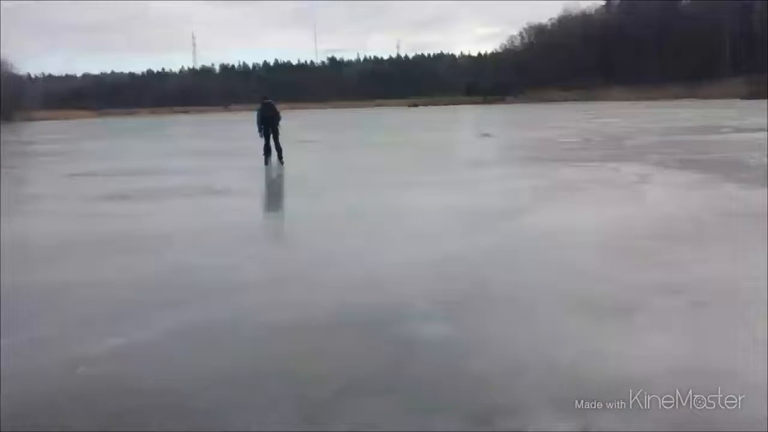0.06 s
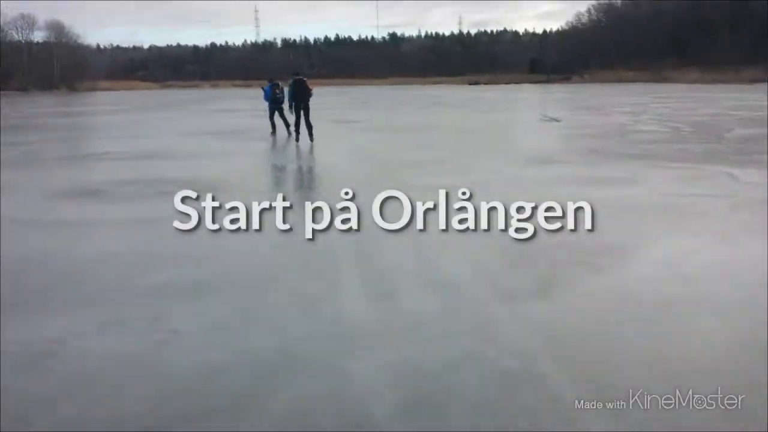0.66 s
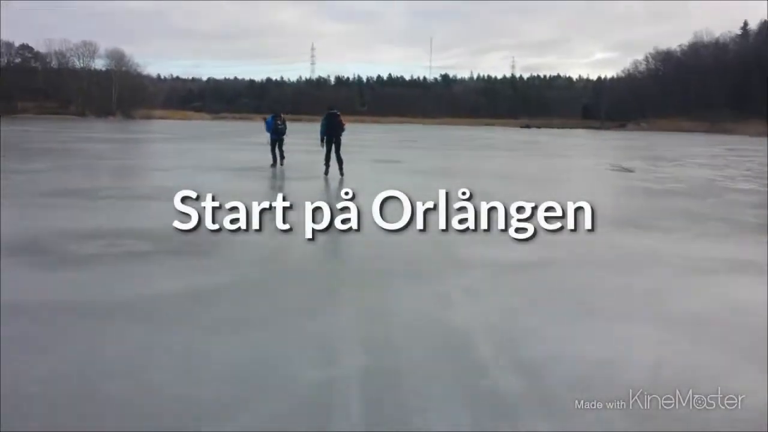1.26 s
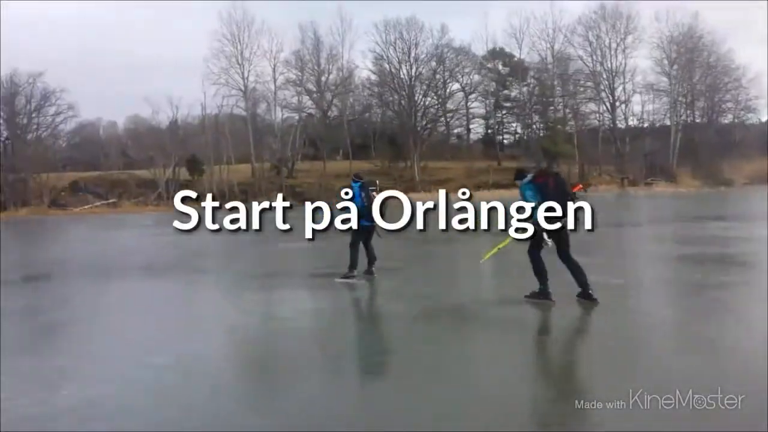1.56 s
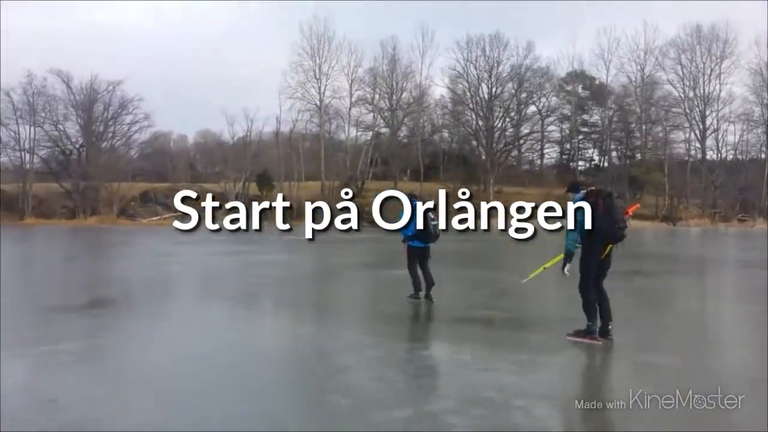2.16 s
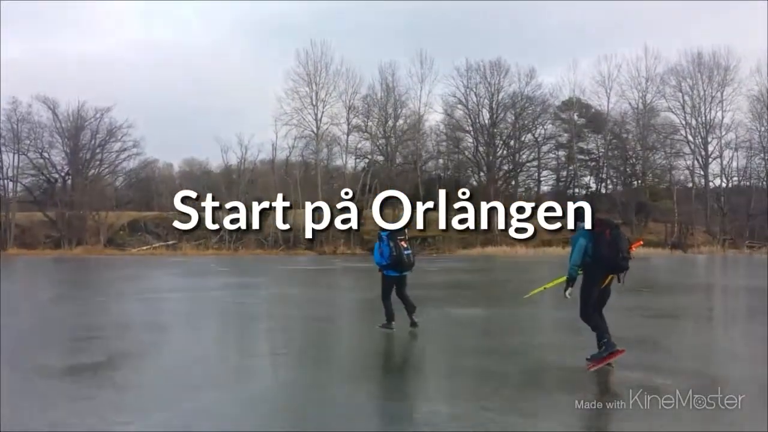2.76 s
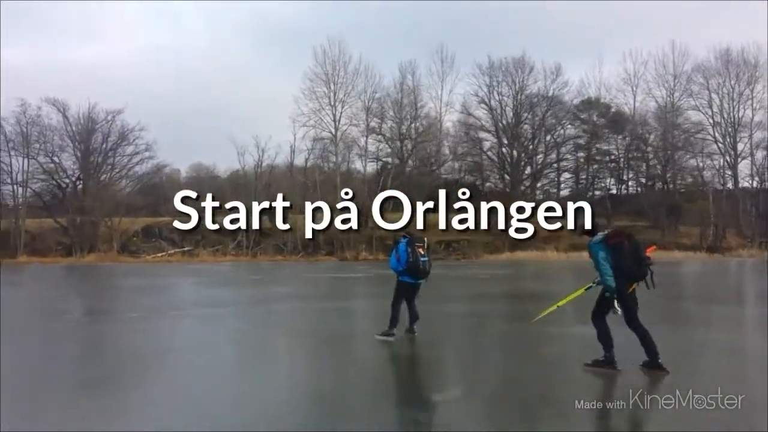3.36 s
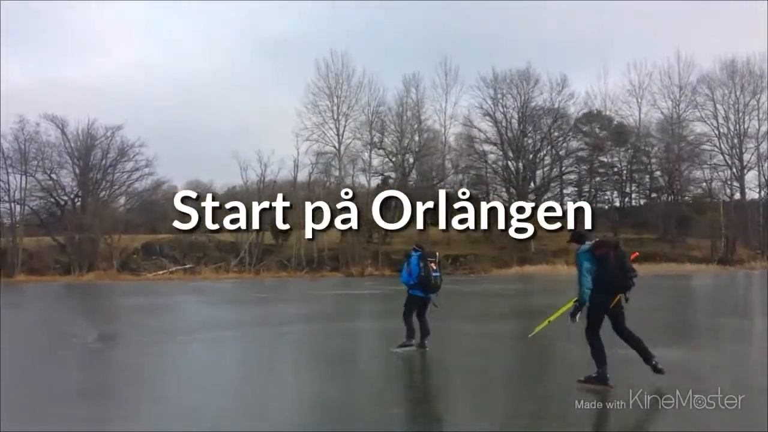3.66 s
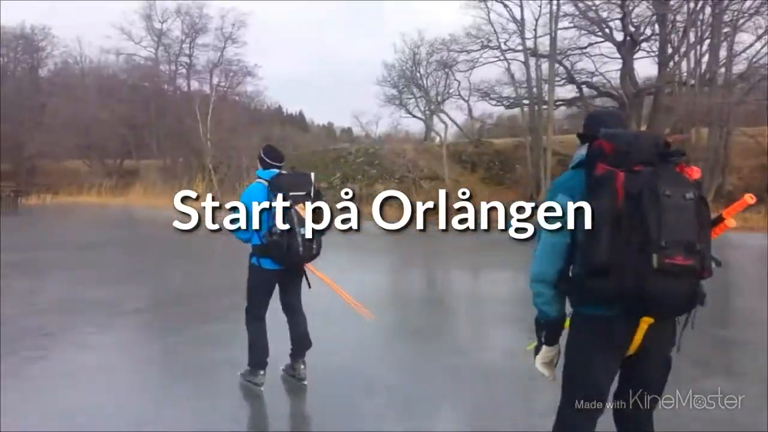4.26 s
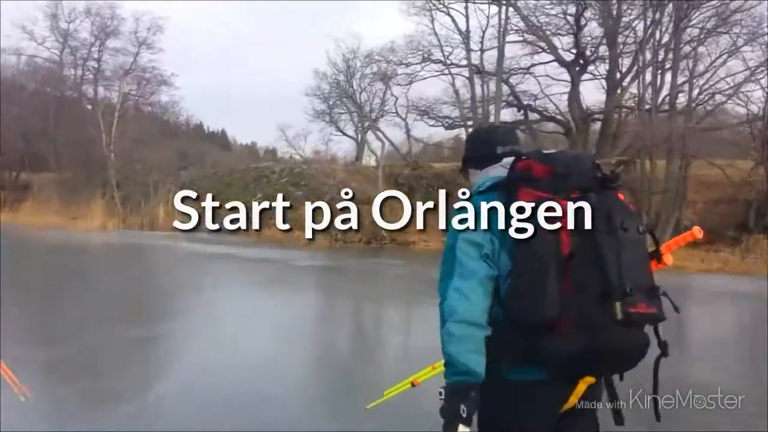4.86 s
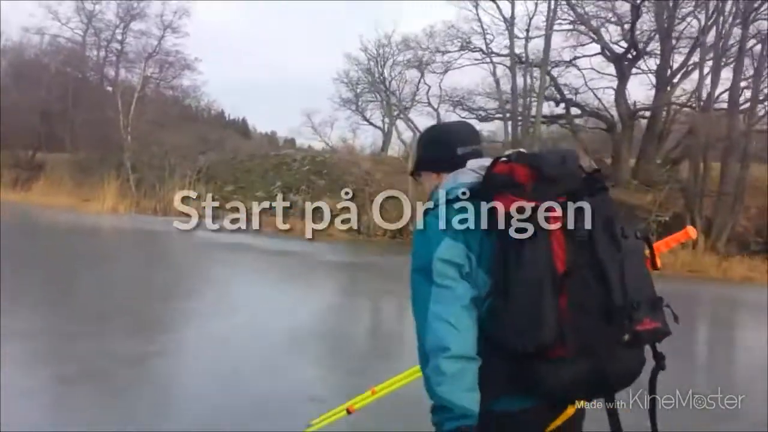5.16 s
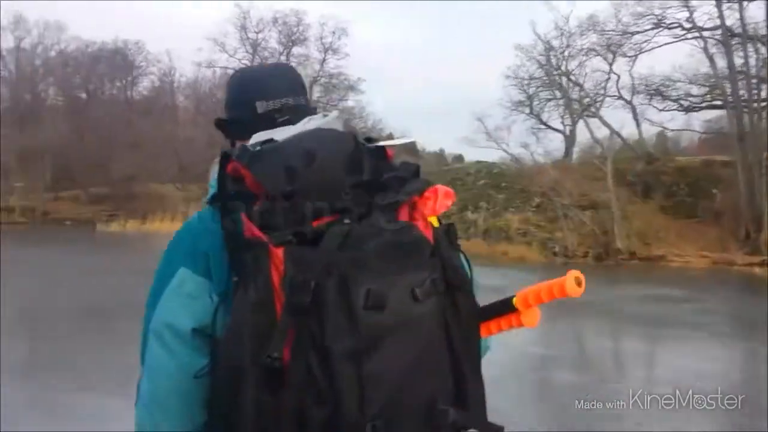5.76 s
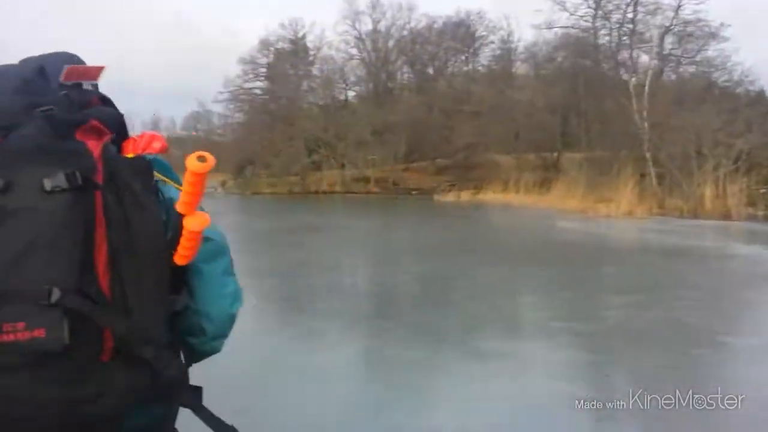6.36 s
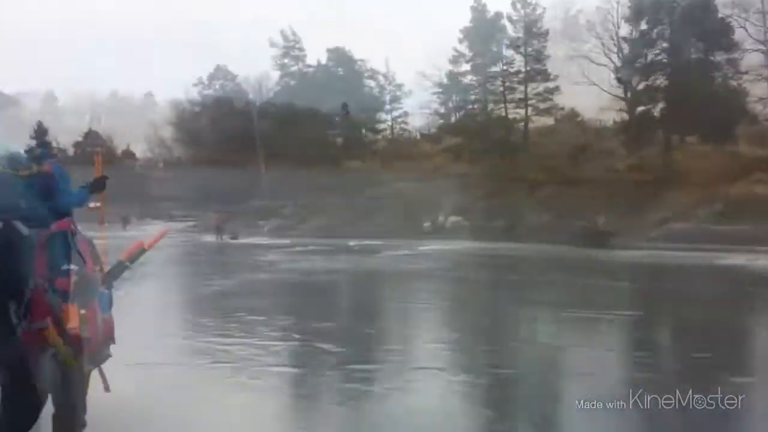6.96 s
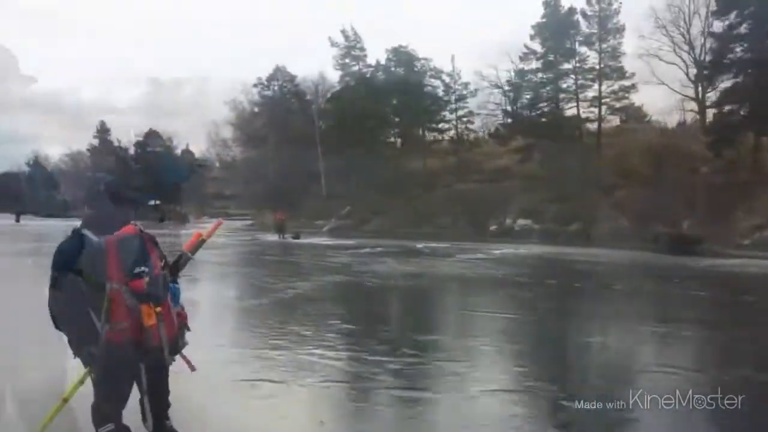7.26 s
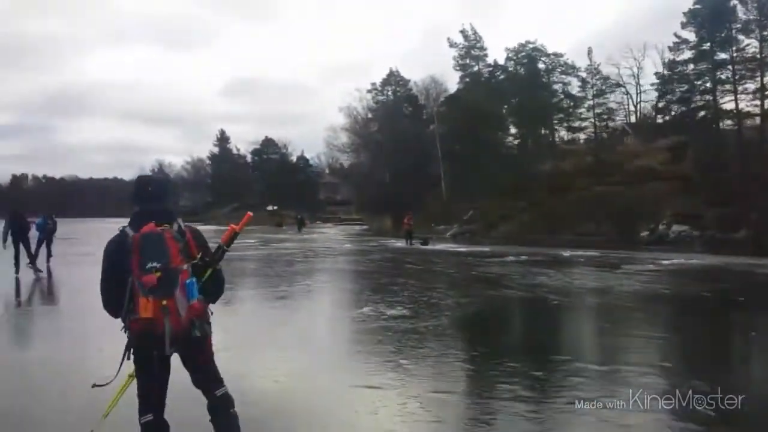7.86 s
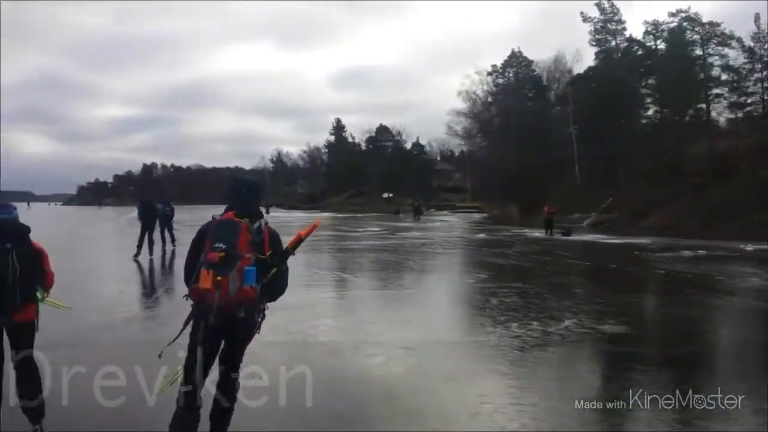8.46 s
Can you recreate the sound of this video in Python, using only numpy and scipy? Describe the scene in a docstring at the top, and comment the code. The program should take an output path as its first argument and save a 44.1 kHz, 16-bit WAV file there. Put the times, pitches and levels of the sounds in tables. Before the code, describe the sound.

Steel skate blades glide across a frozen lake with a coarse scrape, irregular clacks and rasping, sometimes squealing pushes, heard outdoors from a moving skater's microphone. Low wind rumble and small taps of gear run alongside. Two loud, crunching thumps hit the microphone, one early and one midway, each followed by a quieter stretch. The skating then builds again, with a short brush of fabric, and ends rattling over bumps.

```python
"""Long skates on lake ice, heard from a camera that one of the skaters carries.
After a short silence the blades grind, hiss and clack over bumps, air rumbles on the microphone and gear
ticks. From 1 s on, pushes make the steel edge bite, growl and squeal. At 1.6 s and 4.2 s a hard knock
sets the camera mount booming and overloads the input; after each knock the whole sound ducks, then
recovers over about a second. More pushes, two brushes of fabric and a clatter over rough ice follow."""
import sys
import numpy as np
from scipy import signal
from scipy.fft import rfft, irfft, next_fast_len
from scipy.io import wavfile
from scipy.ndimage import map_coordinates

SR = 44100
rng = np.random.default_rng(int(sys.argv[2]) if len(sys.argv) > 2 else 0)


def transcribe(signal):
    """Save signal, clipped to [-1, 1], as a 16-bit WAV file at the path in sys.argv[1]."""
    frames = np.atleast_2d(signal).T
    limited = np.clip(frames, -1, 1)
    pcm = np.round(limited * 32767).astype(np.int16)
    wavfile.write(sys.argv[1], SR, pcm)


N = 374850
TIME = np.arange(N) / SR

# hard knocks on the camera mount: t/s, boom/dB, crunch/dB
KNOCKS = [(1.5815, -4.5, 7), (4.2007, -5, 8.5)]
# tone colour of fine ice spraying off the blade: f/Hz, level/dB
HISS_COLOUR = [(1500, -35), (2300, 5.5), (3000, 4.5), (3700, -1.5), (4600, 2), (5200, 0.5), (5750, 2),
               (6600, -3), (8000, -6.5), (10000, -10), (12000, -22), (15000, -28)]
# tone colour of the ringing skate: f/Hz, level/dB
RING_COLOUR = [(900, -37.5), (1350, -10.5), (1650, 4.5), (1880, 6), (2020, -2), (2200, -16), (3000, -76.5)]


def amp(db):
    """Turn decibels into a gain."""
    return 10 ** (np.asarray(db) / 20)


def unit(x):
    """Scale a signal to an average power of 1."""
    return x / np.sqrt(np.mean(x ** 2) + 1e-20)


def along(points, hz):
    """Read a table of (frequency, value) points on a log frequency axis."""
    freqs, values = np.transpose(points)
    return np.interp(np.log(hz + 1), np.log(freqs + 1), values)


def wobble(rate):
    """A smooth random curve through `rate` points a second."""
    return map_coordinates(rng.standard_normal(int(N * rate / SR) + 4), [TIME * rate])


def add(track, start, sound):
    """Mix a sound into a track, `start` seconds in."""
    i = round(start * SR)
    track[..., i:i + sound.shape[-1]] += sound[..., :N - i]


def panned(pair, pan_db):
    """Make the left channel pan_db louder than the right."""
    return pair * np.array([amp(pan_db / 2), amp(-pan_db / 2)]).reshape(2, -1)


def filtered(x, response):
    """Give each frequency the gain response(hz)."""
    size = next_fast_len(N + SR // 4)
    return irfft(rfft(x, size) * response(np.fft.rfftfreq(size, 1 / SR)), size)[..., :N]


def band(x, hz, width_hz):
    """Keep the sound near one pitch: a resonance, applied twice for steep sides."""
    b, a = signal.iirpeak(hz, hz / width_hz, fs=SR)
    return signal.lfilter(b, a, signal.lfilter(b, a, x))


def coloured(x, colour, size=4096):
    """Give a sound a tone colour, with a filter that rings only after each hit (minimum phase)."""
    cepstrum = irfft(np.log(amp(along(colour, np.fft.rfftfreq(size, 1 / SR)))))
    cepstrum[1:size // 2] *= 2
    cepstrum[size // 2 + 1:] = 0
    kernel = irfft(np.exp(rfft(cepstrum)))
    return signal.oaconvolve(x, kernel[None] / np.linalg.norm(kernel), axes=1)[:, :N]


def grit(rate, spread_db, smooth):
    """Two streams of tiny ice fractures, about `rate` a second, over smooth rubbing noise."""
    hits = rng.random((2, N)) < rate / SR
    sizes = amp(spread_db * np.minimum(rng.exponential(size=(2, N)), 3))
    signs = rng.choice([-1, 1], (2, N))
    return unit(unit(hits * sizes * signs) + smooth * rng.standard_normal((2, N)))


def struck(t, t60, rise):
    """The loudness of a hit: it builds in about `rise` seconds and fades 60 dB in `t60` seconds."""
    return amp(-60 * t / t60) * (1 - np.exp(-t / rise))


def burst(t, t60, rise):
    """Two streams of fading contact noise, each of energy 1."""
    noise = rng.standard_normal((2, len(t))) * struck(t, t60, rise)
    return noise / np.linalg.norm(noise, axis=1, keepdims=True)


def blow(t, t60, scatter):
    """A sharp contact followed by a scatter of crumbling ice."""
    force = scatter * burst(t, t60, rise=0.00013)
    force[0, 0] += 1
    return force


def ports(pair):
    """Two microphone openings hear the first stream together and the second with opposite signs."""
    # how much louder the left opening is: f/Hz, left minus right/dB
    balance = [(100, 8), (230, 1.5), (400, 1), (900, -0.5), (1400, 6.5), (1850, 7.5), (2350, 0), (3200, 8),
               (4500, 3.5), (5750, 11.5), (7500, 2), (9000, -1), (11000, -20), (15000, -5)]
    # how alike the two sides sound: f/Hz, likeness (0 to 1)
    likeness = [(50, 0.084), (120, 0.26), (230, 0.46), (420, 0.83), (950, 0.8), (1350, 0.7), (1750, 0.5),
                (3000, 0.2), (6000, 0.15), (14000, 0.1)]
    # how far the left side is ahead: f/Hz, phase/rad
    lead = [(100, 1.07), (400, 0.082), (900, 0.11), (1350, 1.42), (1750, 0.76), (2250, 3.08), (3200, 1.15)]
    size = next_fast_len(N + SR // 4)
    hz = np.fft.rfftfreq(size, 1 / SR)
    angle = np.arccos(np.clip(along(likeness, hz), 0, 1)) / 2
    left = amp(along(balance, hz) / 2) * np.exp(.5j * along(lead, hz))
    right = 1 / left
    centre_gain = np.hypot(np.cos(angle) * abs(left + right), np.sin(angle) * abs(left - right)) / 2
    shared, apart = rfft(pair, size) * [np.cos(angle), np.sin(angle)] / centre_gain
    return irfft(np.array([left * (shared + apart), right * (shared - apart)]), size)[:, :N]


def air():
    """Passing air rumbles in uneven swells; after a knock the shaking camera briefly rumbles louder."""
    # air streaming past the camera: t/s, level/dB
    airflow = [(0.7, -34.5), (1.0, -27), (1.58, -32.5), (1.85, -56), (2.5, -47.5), (2.7, -42), (2.9, -35.5),
               (3.35, -32), (4.1, -30.5), (4.48, -54), (5.12, -57.5), (5.36, -45.5), (5.95, -41.5),
               (6.7, -45), (8.2, -44.5), (8.5, -38)]
    # tone colour of the rumble: f/Hz, level/dB
    rumble_colour = [(12, -53), (20, -17), (134, 4), (253, -6.5), (350, -13), (460, -17), (770, -120)]
    level_db = np.interp(TIME, *np.transpose(airflow))
    for start, _, _ in KNOCKS:
        shudder_db = -17.5 - 155 * (TIME - start)
        level_db = np.where(TIME > start, np.maximum(level_db, shudder_db), level_db)
    rumble = filtered(rng.standard_normal((2, N)), lambda hz: amp(along(rumble_colour, hz)))
    swells_db = 2.24 * wobble(14) + 1.46 * wobble(7)
    return amp(level_db + 4 + swells_db) * unit(rumble)


def gear():
    """Buckles tick and stiff fabric brushes past the camera, both bright and close."""
    # ticks of small hard parts: t/s, level/dB
    tick_events = [(0.656, -25.5), (0.93, -43), (1.504, -29.5), (1.583, -35.5), (2.3095, -53.5),
                   (2.476, -54), (2.784, -44.5), (3.362, -35), (3.809, -37), (4.0792, -35.5),
                   (4.1247, -37.5), (4.2023, -34), (4.6012, -44), (4.6587, -51), (8.2002, -28.5),
                   (8.2428, -31.5)]
    # tone colour of a tick: f/Hz, level/dB
    tick_colour = [(600, 2.5), (1800, 4), (4000, -1.5), (6000, 0), (9000, -3), (12500, -14), (15000, -19)]
    # brushes of fabric: start/s, loudest/s, end/s, level/dB
    brushes = [(6.26, 6.34, 6.375, -33.5), (8.271, 8.275, 8.35, -39.5)]
    # tone colour of the fabric: f/Hz, level/dB
    fabric_colour = [(600, 1), (1800, 5), (4000, 0.5), (6200, -1.5), (9000, -2), (12500, -6), (15000, -9.5)]
    ticks, cloth = np.zeros((2, 2, N))
    t = np.arange(SR // 16) / SR
    touch = np.exp(-.5 * ((t - .003) / 0.00098) ** 2)  # swells and fades within milliseconds
    for start, db in tick_events:
        add(ticks, start - .0005, amp(db + 3.5) * touch * rng.standard_normal((2, len(t))))
    fibres = unit(rng.standard_normal((2, N)) * amp(4 * wobble(220)))
    for start, loudest, end, db in brushes:
        swell_db = np.interp(TIME, [start, loudest, end], [-24, 0, -16])
        cloth += amp(db + swell_db) * fibres * ((TIME > start) & (TIME < end))
    return coloured(ticks, tick_colour) + coloured(cloth, fabric_colour)


def gear_taps():
    """Loose gear taps the camera's left side: a clack and a falling ring, smeared by rough contact."""
    # taps and rebounds: t/s, rattle f/Hz, thud/dB, ring/dB, crack/dB
    taps = [(0.656, 910, -18.5, -32.5, -29), (1.5067, 790, -15.5, -53, -33), (1.607, 810, -28.5, -48, -65),
            (4.0421, 900, -22.5, -48, -62), (4.0806, 980, -19.5, -41, -29), (4.1274, 1140, -21, -41, -34.5),
            (4.224, 922, -25.5, -52, -59)]
    hits = clacks(taps)
    chirps = np.zeros((2, N))
    t = np.arange(SR // 12) / SR
    halving_s = 0.0068  # the ring has dropped an octave by this time
    for start, hz, thud_db, _, _ in taps:
        cycles = 1.5 * hz * halving_s * np.log1p(t / halving_s)
        ring = np.sin(2 * np.pi * cycles) * amp(-60 * t / 0.13)
        contact = burst(t, t60=0.0083, rise=0.0001)
        add(chirps, start, amp(thud_db - 4) * signal.fftconvolve(contact, ring[None], axes=1))
    return panned(ports(hits + chirps), pan_db=9)


def mount_boom():
    """Knocks ring the camera mount, where two close low notes beat; the hand only bumps it dully."""
    # the mount's own notes: f/Hz, level/dB, time to fade 60 dB/s, left minus right/dB
    modes = [(129.1, 2, 0.38, 8.5), (146.7, -7, 0.42, 21), (215.4, -6.5, 0.27, -9), (256.8, -9, 0.22, 21),
             (318, 1, 0.089, 16), (106, -13, 0.038, 50), (538, -29, 0.26, 25)]
    # bumps of the hand on the camera: t/s, level/dB, f/Hz, time to fade 60 dB/s
    hand_bumps = [(0.894, -14.5, 128, 0.53), (1.355, 6.5, 75, 0.039), (3.943, 12, 85, 0.021),
                  (5.824, -23.5, 129, 0.2)]
    out = np.zeros((2, N))
    t = np.arange(SR // 2) / SR
    for start, db, _ in KNOCKS:
        for hz, mode_db, t60, pan_db in modes:
            ring = -np.sin(2 * np.pi * hz * t) * struck(t, t60, rise=0.0048)
            add(out, start, panned(amp(db + mode_db) * ring, pan_db))
    for start, db, hz, t60 in hand_bumps:
        thump = -np.sin(2 * np.pi * hz * t) * struck(t, t60, rise=0.0076)
        add(out, start, amp([[db + 4], [db - 5]]) * thump)
    return out


def mount_crunch():
    """The housing snaps on each hard knock, and the joints of the mount chatter for a moment."""
    # tone colour of the joints: f/Hz, level/dB
    joint_colour = [(200, -1), (450, 6), (1000, 9), (2000, -1), (4000, -31), (9000, -57)]
    joints, snaps = np.zeros((2, 2, N))
    t = np.arange(SR // 8) / SR
    for start, _, db in KNOCKS:
        chatter = burst(t, t60=0.087, rise=0.002) * amp(5 * wobble(270)[:len(t)])
        add(joints, start, amp(db - 4.5) * chatter / np.linalg.norm(chatter, axis=1, keepdims=True))
        add(snaps, start, amp(db - 1.5) * burst(t, t60=0.035, rise=0.00035))
    return coloured(joints, joint_colour) + band(snaps, hz=2430, width_hz=1960)


def clacks(hits):
    """Each hit gives a short thud, a little rattle, a ring at a pitch of its own and a crack."""
    # tone colour of the crack: f/Hz, level/dB
    crack_colour = [(1500, -39.5), (2250, 23), (3100, 19), (4000, 5.5), (5000, 14.5), (5900, 17),
                    (6700, 0.5), (10000, -8), (15000, -54)]
    out, cracks = np.zeros((2, 2, N))
    t = np.arange(SR // 16) / SR
    for start, rattle_hz, thud_db, ring_db, crack_db in hits:
        thud = np.sin(2 * np.pi * 0.82 * rattle_hz * t) * struck(t, t60=0.0068, rise=0.00062)
        rattle = band(burst(t, t60=0.016, rise=0.00086), rattle_hz, width_hz=550)
        ring = coloured(blow(t, t60=0.03, scatter=0.54), RING_COLOUR)
        pitch = 1 - 0.089 * rng.random() ** 2  # a little lower, depending on where the hit lands
        ring = np.array([map_coordinates(stream, [pitch * t * SR]) for stream in ring])
        add(out[0], start, amp(thud_db + 17.5) * thud)
        add(out, start, amp(thud_db + 38.5) * rattle)
        add(out, start, amp(ring_db + 23.5) * ring)
        add(cracks, start, amp(crack_db + 19) * blow(t, t60=0.023, scatter=0.59))
    return out + coloured(cracks, crack_colour)


def ice_bumps(grind_db):
    """The blades clack over big bumps and random small ones, which follow the grinding's loudness."""
    # big bumps in the ice: t/s, rattle f/Hz, thud/dB, ring/dB, crack/dB
    big_bumps = [(0.687, 650, -16, -30.5, -34), (0.859, 600, -35, -42, -47), (0.891, 824, -27, -34.5, -55),
                 (0.944, 900, -20, -32, -36.5), (0.967, 880, -25, -41, -49), (1, 990, -18.5, -26.5, -32),
                 (1.0149, 915, -23, -27.5, -38), (1.0491, 754, -36, -28, -31.5),
                 (1.1174, 570, -18, -28, -32), (1.1631, 625, -21.5, -50, -55),
                 (1.2488, 704, -18.5, -35, -30), (1.288, 492, -19, -36, -52),
                 (1.3165, 470, -16.5, -50, -30), (1.415, 556, -17.5, -55, -47),
                 (1.4435, 620, -13, -38, -28), (1.468, 590, -18, -44, -31), (1.474, 630, -20, -39, -29),
                 (1.488, 790, -41, -40, -37), (1.803, 740, -19, -30.5, -32.5), (1.8253, 830, -30, -31, -42),
                 (1.8776, 930, -32.5, -30.5, -38), (1.8941, 900, -31, -33.5, -40),
                 (1.916, 800, -39, -43.5, -58), (1.927, 686, -40, -43, -60), (2.073, 615, -41.5, -50, -69),
                 (2.17, 754, -46, -62, -60), (2.194, 700, -58, -45.5, -48.5), (2.393, 700, -50, -43.5, -60),
                 (2.427, 580, -43.5, -41.5, -47.5), (2.557, 610, -38, -52, -58),
                 (2.608, 700, -41, -42.5, -67), (2.757, 690, -34, -49, -47), (2.8003, 720, -27, -53, -52),
                 (2.926, 655, -29, -35, -44), (2.9431, 585, -22.5, -43, -61),
                 (3.031, 630, -15.5, -18.5, -37), (3.081, 487, -17.5, -27, -49),
                 (3.106, 685, -23, -33.5, -64), (3.159, 400, -30, -39, -54), (3.207, 440, -43, -37, -56),
                 (3.2549, 425, -28.5, -36.5, -48), (3.427, 465, -21.5, -29, -56),
                 (3.5106, 455, -19.5, -21, -44), (3.688, 624, -28.5, -49, -55),
                 (3.717, 600, -44, -31.5, -37.5), (3.7848, 720, -22.5, -24.5, -49),
                 (3.845, 527, -20.5, -24, -42), (3.884, 450, -26.5, -57, -39.5),
                 (4.014, 360, -23, -40, -52), (4.694, 620, -37, -60, -64), (4.712, 1100, -45.5, -59, -65),
                 (4.792, 700, -48, -57, -68), (4.888, 626, -37, -49, -73), (4.968, 724, -39, -46, -56),
                 (4.991, 670, -41.5, -59, -51), (5.0354, 634, -34, -45, -40), (5.075, 660, -41, -48, -55),
                 (5.1997, 624, -29.5, -44, -47), (5.3327, 634, -30, -39, -49), (5.356, 660, -28, -57, -46),
                 (5.507, 500, -31, -44, -36), (5.54, 650, -27.5, -45, -52), (5.61, 520, -43, -44, -56),
                 (5.632, 450, -34, -58, -45), (5.649, 402, -27.5, -56, -50), (5.745, 600, -25.5, -46, -42),
                 (5.7817, 610, -20.5, -37, -50), (5.8238, 463, -21, -36, -49), (5.92, 493, -27, -48, -46),
                 (6.063, 523, -19, -37, -41), (6.087, 470, -19, -34, -30), (6.1651, 460, -18, -36, -30),
                 (6.232, 950, -32.5, -49, -49), (6.254, 840, -32, -55, -45), (6.365, 925, -27, -44, -54),
                 (6.387, 602, -14, -26, -46), (6.49, 890, -26, -59, -56), (6.543, 520, -24, -31, -46),
                 (6.661, 440, -34, -43, -57), (6.917, 1040, -25.5, -34.5, -40),
                 (7.148, 820, -36, -33.5, -39), (7.172, 860, -29.5, -41, -52), (7.279, 660, -32, -38, -45),
                 (7.2993, 575, -32.5, -37.5, -44), (7.371, 563, -30.5, -40, -57),
                 (7.418, 600, -47, -53, -54), (7.4825, 694, -26.5, -29, -35), (7.521, 640, -29.5, -39, -43),
                 (7.5484, 915, -28.5, -28.5, -39.5), (7.58, 715, -32, -33.5, -54),
                 (7.612, 650, -31, -44, -54), (7.645, 700, -33, -38, -57), (7.665, 620, -31, -54, -52),
                 (7.712, 524, -23, -33, -42), (7.7511, 670, -36, -27, -46), (7.783, 620, -22, -55, -53),
                 (7.79, 1200, -30.5, -48, -37), (7.833, 674, -21, -35.5, -31.5),
                 (7.853, 494, -28.5, -35, -52), (7.879, 920, -32.5, -42, -37.5),
                 (7.912, 700, -30, -40, -41), (7.925, 1290, -33.5, -44, -46), (7.956, 730, -24, -26.5, -41),
                 (7.981, 630, -23.5, -28.5, -38), (8.022, 624, -29, -52, -44), (8.072, 543, -29, -30, -45),
                 (8.092, 600, -25, -36, -50), (8.1564, 640, -27, -33, -64), (8.1811, 484, -26.5, -36, -39),
                 (8.211, 600, -31, -30, -44), (8.248, 638, -29, -34, -33), (8.2682, 636, -19, -21.5, -48),
                 (8.36, 645, -29, -25.5, -49), (8.373, 585, -24, -30, -36), (8.412, 547, -18, -24, -38),
                 (8.4289, 580, -26, -30, -45), (8.4563, 580, -32, -23.5, -58), (8.4902, 440, -27, -32, -59)]
    # stretches full of small bumps: start/s, end/s, thud over the grind/dB
    rough_ice = [(1.05, 1.42, -0.5), (2.603, 4.05, -2.5), (5.301, 5.56, 6), (7.151, 8.5, -4.5)]
    typical_gap_s, typical_hz, scatter_db = 0.05, 680, 3
    small_bumps = []
    for start, end, over_db in rough_ice:
        chance = rng.standard_normal((64, 5))
        times = start + np.cumsum(typical_gap_s * np.exp(.5 * chance[:, 0]))
        for when, (_, pitch, force, ring, crack) in zip(times[times < min(end, TIME[-1])], chance):
            hz = typical_hz * 2 ** (0.4 * pitch)
            db = grind_db[int(when * SR)] + over_db + scatter_db * force
            small_bumps.append((when, hz, db, db - 3 + scatter_db * ring, db - 18 + scatter_db * crack))
    return clacks(big_bumps + small_bumps)


def glide(grind_db):
    """The blades crush the ice: a coarse grind, the skate's ring and a fine hiss flutter together."""
    # tone colour of the grinding: f/Hz, level/dB
    grind_colour = [(120, -34.5), (220, 6), (350, 3.5), (680, -0.5), (1050, -1.5), (1420, -6), (1700, -39),
                    (1900, -8.5), (2250, -25.5), (2700, -22.5), (3600, -21.5), (6000, -67)]
    chatter = wobble(60)
    pits = (rng.random(N) < 32 / SR) * amp(31 + rng.uniform(-11, 0, N))  # flaws in the ice tick dryly
    pits = pits * [[1], [0]]  # in the first stream only
    grind = coloured(grit(rate=400, spread_db=1.5, smooth=1.67) + pits, grind_colour)
    ring = coloured(grit(rate=300, spread_db=6.5, smooth=0.69) + pits, RING_COLOUR)
    hiss = unit(coloured(grit(rate=1200, spread_db=0, smooth=1), HISS_COLOUR))
    ring_db = 0.69 * grind_db - 25.5  # the ring stands out when the grinding is quiet
    hiss_db = 1.059 * grind_db - 13.2
    return (amp(grind_db - 1.5 + 3.4 * chatter) * grind
            + amp(ring_db + 1.4 * chatter) * ring
            + amp(hiss_db + 1.44 * chatter) * hiss)


def squeaks():
    """The edge catches, and rubbing drives one thin note of the blade, which swells and dies away."""
    # catches of the edge: start/s, end/s, f/Hz, level/dB
    catches = [(3.252, 3.315, 4000, -54.5), (3.58, 3.745, 4090, -56), (6.06, 6.175, 6160, -54),
               (6.1, 6.185, 4440, -46), (6.908, 6.975, 3230, -44)]
    out = np.zeros((2, N))
    for start, end, hz, db in catches:
        t = np.arange(round((end - start) * SR)) / SR
        note = unit(band(rng.standard_normal((2, len(t))), hz, width_hz=80))
        add(out, start, amp(db) * np.sin(np.pi * t / (end - start)) * note)
    return out


def sagging(pair, t):
    """As the blade settles its pitch sags and wavers: the sound is read fast at first, then slows."""
    sharp_share, settle_s = 0.1, 0.05
    ahead_s = sharp_share * settle_s * (1 - np.exp(-t / settle_s))
    ahead_s += 0.00048 * map_coordinates(rng.standard_normal(32), [t * 24])
    return np.array([map_coordinates(stream, [(t + ahead_s) * SR], mode="mirror") for stream in pair])


def reflected(spray, t, delay_s):
    """The ice reflects the spray; the path grows as the leg swings out, so the colour sweeps down."""
    sway = 0.032 * map_coordinates(rng.standard_normal(32), [t * 24])  # the leg is not quite steady
    late = t - delay_s * (1 + 0.6 * t + sway)
    reflection = np.array([np.interp(late, t, stream) for stream in spray])
    return unit(spray + amp(-4) * reflection)


def pushes(grind_db):
    """Under load the edge sticks and slips: the ice growls and sprays, the steel rasps and squeals."""
    # pushes, with levels over the grind: start/s, end/s, bite f/Hz, bite width/Hz, bite/dB, growl/dB,
    # fade/(dB per s), squeal f/Hz, squeal/dB, spray/dB, rasp/dB, delay of the spray's reflection/s
    strokes = [(1.004, 1.167, 857, 330, 8, 0, 28, 2970, -10, -28, -5, 0.00097),
               (1.114, 1.473, 873, 400, 5, 10.5, 24.5, 3000, -19, -21, -32, 0.001),
               (1.204, 1.376, 905, 400, 1.5, -16.5, 28, 2510, -23, -3, -10, 0.00123),
               (1.72, 1.808, 900, 500, 10, 6, 20, 3000, -9, -1.5, -7, 0.001),
               (3.257, 3.328, 1030, 430, -8, -18, 30, 3000, -9, -20, -1.5, 0.00083),
               (3.356, 3.603, 1004, 380, 6, -2, 23, 3340, -16, -24, -14, 0.0009),
               (3.609, 3.735, 1010, 430, -3.5, -22, 32, 2840, -8, -11.5, -28, 0.0007),
               (4.551, 4.74, 920, 600, -2, 6, 12, 3000, -22, -10, -20, 0.00075),
               (5.034, 5.257, 1300, 700, -3, 2, 37, 3000, -16, -27, -8.5, 0.00089),
               (5.293, 5.596, 794, 437, 6, 5, 34.5, 1780, 1.5, -4, -7, 0.001067),
               (5.912, 6.13, 800, 325, 7.5, 5, 26, 3300, -20, -10.5, -10, 0.00087),
               (6.06, 6.196, 855, 370, -6, 5, 32, 2850, -2, -1.5, -5, 0.00068),
               (6.294, 6.371, 1175, 450, 10, 9, 11, 2740, -2, 3.5, 1, 0.00113),
               (6.376, 6.622, 820, 240, 6.5, 2.5, 2, 2370, -16, -22.5, -21, 0.0008),
               (6.913, 7.264, 872, 400, 15, 7.5, 30.5, 2890, -2.5, -3.5, -5, 0.00067),
               (7.257, 7.387, 854, 360, -24, -13, 30, 3130, -10.5, -13.5, -15, 0.0009)]
    # notes of the rasping steel, the same on every push: f/Hz, width/Hz, level/dB
    rasp_modes = [(1854, 150, 4), (2740, 460, -6), (3325, 190, -7.5), (4230, 300, -15.5), (5980, 190, -19)]
    # notes of the squealing blade: multiple of the squeal pitch, width/Hz, level/dB
    squeal_modes = [(1.001, 170, 19), (1.13, 262, 10.5), (1.5, 320, 1.5), (1.93, 300, 2)]
    press_s, release_s, squeal_build_s, growl_ratio = 0.029, 0.1, 0.053, 0.513
    out = np.zeros((2, N))
    slips = grit(rate=540, spread_db=6, smooth=0.9)
    spray = coloured(grit(rate=700, spread_db=3, smooth=0.65), HISS_COLOUR)
    spray *= unit(amp(2.5 * wobble(90)))
    rasp = sum(amp(db) * unit(band(slips, hz, width)) for hz, width, db in rasp_modes)
    judder = unit(amp(wobble(140)))  # the loaded edge chatters
    for (start, end, bite_hz, width_hz, bite_db, growl_db, fade_db_per_s,
         squeal_hz, squeal_db, spray_db, rasp_db, delay_s) in strokes:
        span = slice(round(start * SR), round(end * SR))
        t = TIME[span] - TIME[span.start]
        slip = slips[:, span]
        load = np.clip(np.minimum(t / press_s, (end - start - t) / release_s), 0, 1)
        load *= amp(-fade_db_per_s * t) * judder[span]
        bite = unit(sagging(band(slip, bite_hz, width_hz), t))
        growl = unit(sagging(band(slip, growl_ratio * bite_hz, growl_ratio * width_hz), t))
        squeal = sum(amp(db) * band(slip, ratio * squeal_hz, width) for ratio, width, db in squeal_modes)
        squeal = unit(sagging(squeal, t)) * np.minimum(t / squeal_build_s, 1)
        swish = reflected(spray[:, span], t, delay_s)
        bright = amp(squeal_db) * squeal + amp(spray_db) * swish + amp(rasp_db) * rasp[:, span]
        out[:, span] += load * (amp(bite_db) * bite + amp(growl_db) * growl + bright)
    return amp(grind_db) * out


def scene():
    """Air, gear and skates in the open, fading in quickly after a short silence."""
    # loudness of the grinding as heard: t/s, level/dB
    grind_level = [(0.95, -37), (1.13, -33.5), (1.42, -31), (1.58, -42.5), (1.66, -49), (1.76, -47),
                   (1.98, -53), (2.52, -51.5), (2.85, -39.5), (3.5, -37.5), (4.18, -39.5), (4.44, -50),
                   (4.92, -55), (5.35, -40), (5.6, -39.5), (5.88, -38.5), (6.06, -37), (6.54, -36.5),
                   (6.7, -41), (6.98, -38.5), (7.55, -39.5), (8.1, -40.5), (8.5, -39.5)]
    # the treble of the pushes and squeaks leans slightly left: f/Hz, left minus right/dB
    edge_pan = [(900, 0), (2500, 1)]
    grind_db = np.interp(TIME, *np.transpose(grind_level))
    gliding = air() + glide(grind_db) + ice_bumps(grind_db) + gear() + mount_crunch()
    edges = ports(pushes(grind_db) + squeaks())
    edges = filtered(edges, lambda hz: panned(0.93, along(edge_pan, hz)))
    fade_in = np.clip((TIME - 0.5503) / 0.055, 0, 1) ** 2
    return (ports(gliding) + edges + gear_taps() + mount_boom()) * fade_in


def record(dry):
    """The input overloads on the knocks and keeps nothing above 15 kHz."""
    return filtered(np.clip(dry, -.95, .95), lambda hz: hz < 15000)


dry = scene()
out = record(dry)
transcribe(out)
```